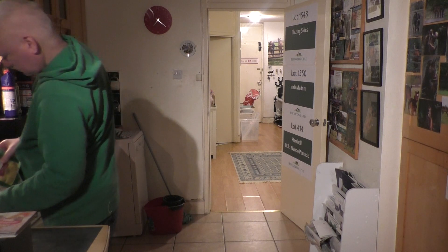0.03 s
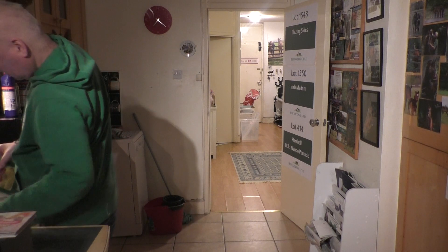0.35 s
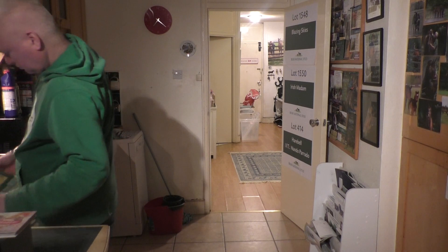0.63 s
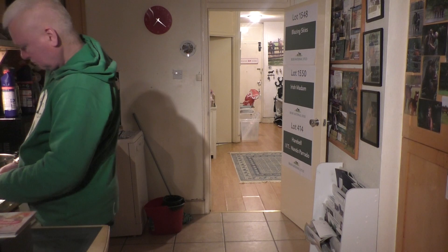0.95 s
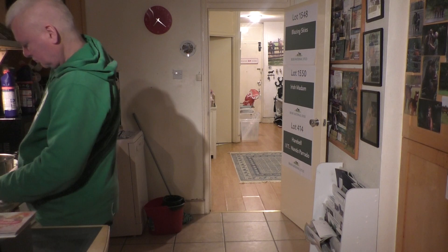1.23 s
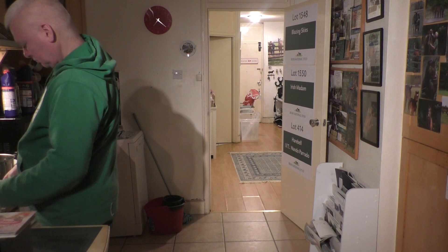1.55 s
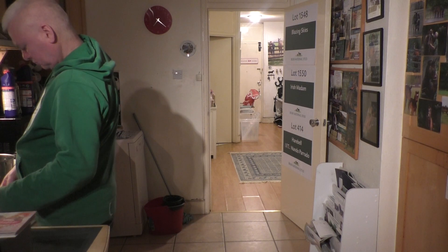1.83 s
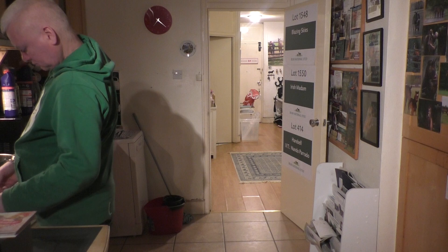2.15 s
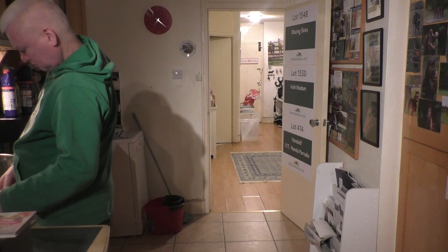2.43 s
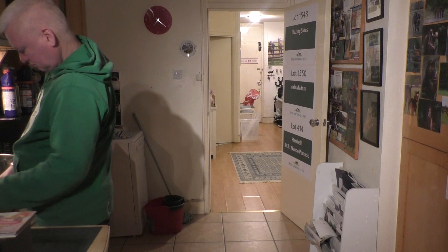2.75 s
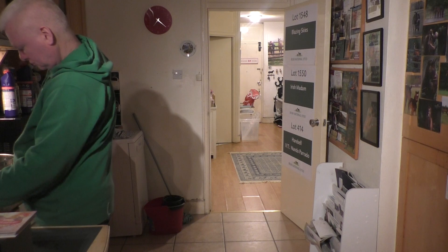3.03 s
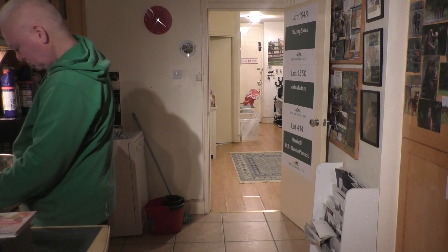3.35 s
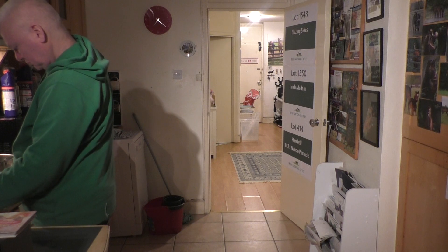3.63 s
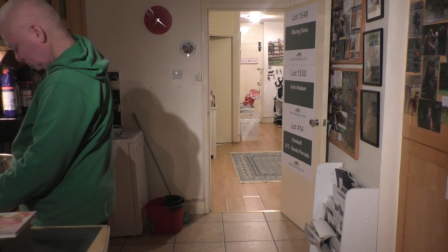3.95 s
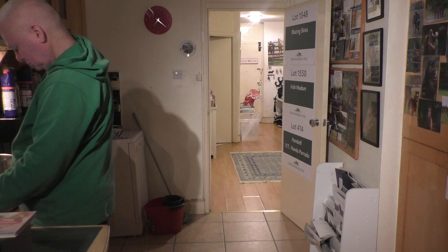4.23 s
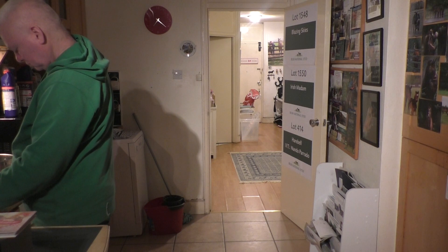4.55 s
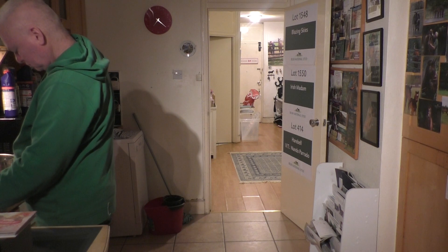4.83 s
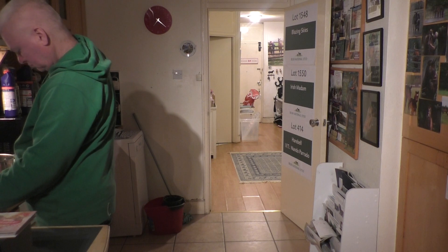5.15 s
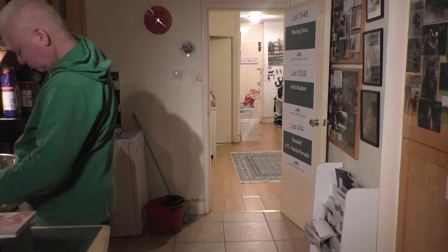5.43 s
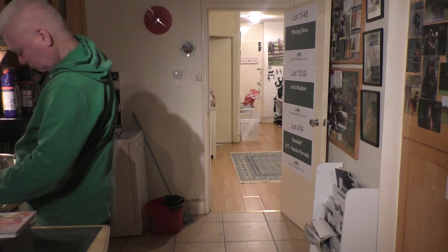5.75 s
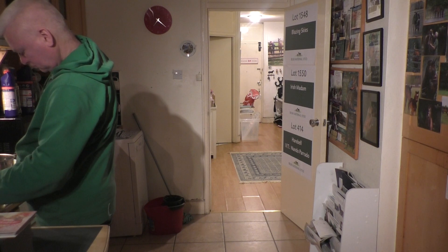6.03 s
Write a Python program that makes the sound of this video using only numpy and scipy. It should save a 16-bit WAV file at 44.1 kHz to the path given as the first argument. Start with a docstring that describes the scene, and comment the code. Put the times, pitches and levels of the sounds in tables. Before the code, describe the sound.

Over the steady low hum of an appliance, someone washes up in a slightly echoing kitchen. After a faint squeak of a sliding rim, pots, plates and cutlery knock against the steel basin and clink together, busiest and loudest in the first half. Later come scattered knocks, light scrapes and a couple of hollow thuds. The sink is a couple of metres from the microphone, slightly left.

```python
"""Washing up at a steel sink

Pots, plates and cutlery knock against the basin and clink on each other, a couple of metres away.
Between the blows they rub and slide; at the start, friction makes a rim sing and squeak.
The hard-walled kitchen answers every contact, and an appliance hums steadily."""
import sys
import numpy as np
from scipy import signal
from scipy.fft import rfft, irfft
from scipy.io import wavfile

SR = 44100
rng = np.random.default_rng(int(sys.argv[2]) if len(sys.argv) > 2 else 0)


def put_to_file(sound):
    """Save the sound as 16-bit audio at rate SR, in the file named by the first command-line argument."""
    columns = np.atleast_2d(sound).T  # one column per channel
    safe = np.clip(columns, -1, 1)
    whole_steps = np.round(safe * 32767)
    wavfile.write(sys.argv[1], SR, whole_steps.astype(np.int16))


N = 277830
TIME = np.arange(N) / SR

# stereo width: freq_hz, side_over_mid_db
WIDTH = [(30, -2), (125, -8), (300, -12), (1000, -9), (2200, -7.5), (4500, -9), (8000, -12), (13000, -19)]
# steady background, low room rush plus faint high microphone hiss: freq_hz, gain_db
BACKGROUND = [(25, -15), (70, -11), (95, -4.5), (135, 1.5), (170, -2), (200, 4), (320, -1), (420, -4),
              (520, -5), (650, -11), (850, -12), (1200, -11), (2200, -13), (4000, -32), (8000, -34),
              (13000, -24), (17000, -30.5)]
# friction envelopes of a sliding rim: start_s, end_s, fade_s, level_db
SINGING = (0, .42, .09, -51.5)
SQUEAK = (.09, .215, .015, -52)
# scuffs and slides: peak_s, fade_s, strength_db, hardness_db
STROKES = [(0.3, .36, -52.5, 4), (0.428, .022, -41.5, -2), (0.823, .009, -44, 13), (0.92, .15, -44.5, -6),
           (1.2, .11, -38, -17), (1.337, .018, -45, 10), (1.387, .026, -41.5, 8.5),
           (2.439, .016, -37, -4.5), (2.54, .08, -43.5, -8), (2.587, .018, -37.5, -4),
           (2.8, .15, -54.5, -3.5), (3.13, .036, -46, -7.5), (3.44, .09, -55, -7), (4.1, .03, -54, -4),
           (4.575, .085, -45.5, -10), (5.18, .028, -42.5, -8), (5.34, .2, -56, -4.5),
           (5.56, .017, -40.5, -7)]
# knocks in the sink: start_s, strength_db, hardness_db, kind
KNOCKS = [(0.0498, -55, 6, "rim"), (0.2905, -55, 11, "cutlery"), (0.698, -39, -16, "wall"),
          (0.8085, -24, -7, "wall"), (0.9607, -25.5, -17, "wall"), (0.9969, -25.5, -25, "wall"),
          (1.0624, -37, -4.5, "rim"), (1.1074, -25.5, -7.5, "wall"), (1.2104, -35.5, -2, "cutlery"),
          (1.2191, -18.5, -12.5, "rim"), (1.256, -19, -14, "rim"), (1.2832, -38, 9.5, "cutlery"),
          (1.3746, -31.5, -4.5, "wall"), (1.493, -26.5, -1.5, "rim"), (1.6937, -35.5, -22.5, "rim"),
          (1.9017, -28.5, -16, "rim"), (1.977, -26, -5, "rim"), (2.155, -34, -22, "wall"),
          (2.4335, -28, -8.5, "wall"), (2.5073, -24.5, -13.5, "wall"), (2.5925, -38, 1, "rim"),
          (2.699, -35, -19, "wall"), (3.1413, -28, -19.5, "wall"), (3.2774, -38, -23, "wall"),
          (4.0035, -49, -11, "cutlery"), (4.1265, -27.5, -9, "floor"), (4.4642, -50.5, 1, "cutlery"),
          (4.578, -29, -23, "wall"), (5.5917, -28, -15.5, "wall"), (5.7863, -41, -11, "rim"),
          (5.8374, -35, -10.5, "floor"), (6.0741, -40, -9.5, "rim")]
# per kind of knock: weight_db, fineness_db, bounce_s, chatter_ratio
BLOWS = {"rim": (-21, -6.5, .007, 1.3), "wall": (-15.5, -4, .008, 1.2), "floor": (-7.5, -8, .012, 1.4),
         "cutlery": (-1, -1.5, .005, 1.0)}
# spectra of a contact's body, hard edge and finest tick: freq_hz, gain_db
CLACK = [(40, -41), (200, -23), (400, -14.5), (650, -11), (900, -8), (1060, 1), (1600, 0.5), (2100, -2),
         (2700, -4), (3700, -9.5), (5000, -18.5), (8000, -23.5), (17000, -70)]
CRACK = [(40, -69), (700, -49), (2000, 5), (3600, 4.5), (5000, 2.5), (6500, -1), (8000, -7.5),
         (10000, -14.5), (17000, -34)]
TICK = [(40, -63), (3000, -20), (7500, -2.5), (9300, 0), (12000, -2.5), (14000, -6.5), (17000, -19)]
# modes of the rim, basin and dishes: pitch_hz, energy_db, t60_s
RIM = [(1330, -1, 0.023), (2200, 5, 0.01), (4250, -4, 0.012)]
BASIN_WALLS = [(997, 0.5, 0.23), (1119, 5.5, 0.054), (1323, 4.5, 0.18), (1430, 0, .12), (1550, -1, 0.098),
               (1793, -1.5, 0.071), (2110, -3, 0.16), (3520, -4.5, 0.013)]
BASIN_FLOOR = [(135, -12, .08), (285, -3.5, 0.037), (317.7, 0.5, 0.13), (384.6, 0, 0.056), (438, -4, 0.045),
               (526, -4.5, 0.1), (734, -4, 0.043), (894, -5, .04)]
BASIN_BOOM = [(285, -0.5, 0.061), (312, -2, 0.097), (1010, -11, .06), (1134, -3, .04), (2760, -8, .04),
              (3500, -16, .015)]
POT = [(1053, -11, 0.021), (1456, -7, 0.06), (1546, -3, .04), (1680, -1, 0.0099), (2290, -7.5, .015),
       (2690, -16, .04)]
PLATE = [(1015, -17.5, 0.092), (1914, -9, 0.016), (2000, -10, .06), (2470, -25, .04), (2960, -3.5, 0.017),
         (3150, -6, 0.027), (3280, -6.5, .045), (3360, -7.5, .045), (4380, -6, 0.0057),
         (5360, -11.5, 0.0023), (6080, -14, 0.0098)]
BOWL = [(1550, -2.5, 0.0099), (2220, -7, 0.044), (3122, -10, .04), (3320, -9, 0.05), (3600, -6, .02),
        (3865, -5.5, .05), (4150, -7, 0.013), (4600, -8.5, .012), (5800, -8.5, 0.0046)]
BODIES = {"pot": POT, "plate": PLATE, "bowl": BOWL, "basin": BASIN_BOOM}
# blows that ring a dish or boom the basin: start_s, strength_db, body
RINGS = [(0.8098, -24.5, "pot"), (1.28, -28, "pot"), (1.376, -38, "bowl"), (1.4925, -26.5, "plate"),
         (0.999, -46, "pot"), (1.692, -47, "pot"), (1.902, -38.5, "pot"), (1.976, -30, "bowl"),
         (2.592, -38.5, "bowl"), (3.594, -50, "pot"), (4.129, -42.5, "basin"), (4.579, -45, "plate"),
         (5.839, -45.5, "basin")]


def from_db(db):
    """Decibels to gain."""
    return 10 ** (np.asarray(db) / 20)


def unit_rms(x):
    """Scale to rms 1."""
    return x / np.sqrt(np.mean(x ** 2) + 1e-20)


def unit_energy(x):
    """Scale to energy 1."""
    return x / np.sqrt(np.sum(x ** 2) + 1e-20)


def bin_gains(spectrum, size=N):
    """Gain per FFT bin, interpolated in dB over log frequency."""
    freq_hz, gain_db = np.transpose(spectrum)
    bins_hz = np.maximum(np.fft.rfftfreq(size, 1 / SR), 1)
    return from_db(np.interp(np.log(bins_hz), np.log(freq_hz), gain_db))


def drift(rate_hz):
    """Straight lines between Gaussian random knots."""
    return np.interp(TIME * rate_hz, np.arange(N), rng.standard_normal(N))


def swell(start_s, end_s, fade_s, roundness=1.5):
    """Envelope: smooth rise, 1 from start to end, mirrored fall."""
    outside_s = np.abs(TIME - np.clip(TIME, start_s, end_s))
    return np.exp(-np.minimum((outside_s / fade_s) ** roundness, 40))


def add(track, start_s, sound):
    """Mix a sound into a track."""
    start = max(round(start_s * SR), 0)
    track[start:start + len(sound)] += sound[:N - start]


def through(stereo, response):
    """Convolve with an impulse response scaled to energy 1."""
    return np.array([signal.fftconvolve(channel, unit_energy(response))[:N] for channel in stereo])


def colour(spectrum, size=8192):
    """Minimum-phase impulse response of a spectrum."""
    cepstrum = irfft(np.log(bin_gains(spectrum, size)))
    cepstrum[1:size // 2] *= 2
    cepstrum[size // 2 + 1:] = 0
    return irfft(np.exp(rfft(cepstrum)))


def ringing(modes):
    """Impulse response of a struck body: damped modes of alternating sign."""
    t = TIME[:SR // 2]
    response = 0
    for k, (pitch_hz, energy_db, t60_s) in enumerate(modes):
        mode = np.cos(2 * np.pi * pitch_hz * t) * from_db(-60 * t / t60_s)
        response += (-1) ** k * from_db(energy_db) * unit_energy(mode)
    return response


def diffuse():
    """Stereo noise arriving from all around."""
    mid, side = rng.standard_normal((2, N))
    side = irfft(rfft(side) * bin_gains(WIDTH), N)
    return np.array([mid + side, mid - side])


def echo_envelope(force, t60_s):
    """Amplitude of the decaying energy a force leaves in the room."""
    retained = from_db(-60 / (t60_s * SR)) ** 2
    return np.sqrt(signal.lfilter([1 - retained], [1, -retained], force ** 2 + 1e-18))


def kitchen(force, t60_s, direct_db=-7, early_db=-6, early_t60_s=0.077, wall_hz=11000, lumpy_db=4.0):
    """Direct sound, lumpy early echoes and a duller tail off hard walls."""
    early = unit_rms(diffuse() * from_db(lumpy_db * drift(2500)))
    early *= echo_envelope(force, early_t60_s)
    pole = np.exp(-2 * np.pi * wall_hz / SR)
    tail = signal.lfilter([1 - pole], [1, -pole], unit_rms(diffuse()))
    tail *= echo_envelope(force, t60_s)
    return from_db(direct_db) * force + from_db(early_db) * early + tail


def appliance(pitch_hz=229.6, wander=0.0025, hum_db=-53, waver_db=1.4, background_db=-55):
    """A motor's steady tone over low room rush and faint high hiss."""
    background = unit_rms(irfft(rfft(diffuse()) * bin_gains(BACKGROUND), N))
    phase = 2 * np.pi * np.cumsum(pitch_hz * (1 + wander * drift(5.84))) / SR
    hum = unit_rms(np.sin(phase)) * from_db(hum_db + waver_db * drift(7.1))
    return from_db(background_db) * background + hum


def sliding_rim(squeak_hz=3080, waver=0.037):
    """Friction makes a rim sing; stick and slip briefly lock onto one wavering tone."""
    sing_gain, squeak_gain = [from_db(level_db) * swell(start_s, end_s, fade_s)
                              for start_s, end_s, fade_s, level_db in (SINGING, SQUEAK)]
    phase = 2 * np.pi * np.cumsum(squeak_hz * (1 + waver * drift(900))) / SR
    singing = through(unit_rms(diffuse()), ringing(RIM))
    return sing_gain * singing + squeak_gain * unit_rms(np.sin(phase))


def rubbing(slips_per_s=3000, uneven_db=3.2, rest_rub_db=-58.3, rest_hiss_db=-72.5, jolt_s=0.001):
    """Rub, bump and hiss forces: constant tiny slips under an uneven hand, pressed harder in strokes."""
    rub, bump, hiss = from_db(rest_rub_db), 0, from_db(rest_hiss_db)
    for peak_s, fade_s, strength_db, hardness_db in STROKES:
        pressure = from_db(strength_db) * swell(peak_s, peak_s, fade_s)
        rub = np.hypot(rub, pressure)
        bump = np.hypot(bump, pressure * (jolt_s / fade_s) ** 0.3)  # slower strokes thud less
        hiss = np.hypot(hiss, pressure * from_db(hardness_db))
    slips = rng.standard_normal(N) * (rng.random(N) < slips_per_s / SR)
    return np.array([rub, bump, hiss]) * unit_rms(slips * from_db(uneven_db * drift(35)))


def contact(bounce_s, chatter_ratio, bounces_per_s=1500):
    """Force of one blow: a sharp touch, then tiny bounces dying as the object seats."""
    t = TIME[:SR // 8]
    bounces = rng.standard_normal(len(t)) * (rng.random(len(t)) < bounces_per_s / SR)
    force = chatter_ratio * unit_energy(bounces * np.exp(-t / bounce_s))
    force[0] = 1
    return unit_energy(force)


def knocks(clack_db=20, thud_db=27, crack_db=29, tick_db=29):
    """Clack, thud, crack and tick forces: hardness lifts the edge, kind sets weight and rattle."""
    forces = np.zeros((4, N))
    for start_s, strength_db, hardness_db, kind in KNOCKS:
        weight_db, fineness_db, bounce_s, chatter_ratio = BLOWS[kind]
        blow = contact(bounce_s, chatter_ratio)
        gains_db = [clack_db, thud_db + weight_db,
                    crack_db + hardness_db, tick_db + hardness_db + fineness_db]
        for force, gain_db in zip(forces, gains_db):
            add(force, start_s, from_db(strength_db + gain_db) * blow)
    return forces


def sink(clack_db=-1, walls_db=-8, hiss_tick_db=-3):
    """Rubs and knocks drive the basin: a clack that rings its walls, a floor thud, a crack, a tick."""
    rub, bump, hiss = rubbing()
    clack, thud, crack, tick = knocks() + [rub, bump, hiss, from_db(hiss_tick_db) * hiss]
    body = through(kitchen(clack, t60_s=0.48), colour(CLACK))
    walls = through(kitchen(clack, t60_s=0.48), ringing(BASIN_WALLS))
    floor = through(kitchen(thud, t60_s=0.44), ringing(BASIN_FLOOR))
    edge = through(kitchen(crack, t60_s=0.48, direct_db=-10, early_db=-5), colour(CRACK))
    top = through(kitchen(tick, t60_s=0.37, direct_db=-13, early_db=-7, wall_hz=5930), colour(TICK))
    return from_db(clack_db) * body + from_db(walls_db) * walls + floor + edge + top


def clinks_and_booms(ring_db=28):
    """Struck dishes ring in their own modes; the basin booms low under a heavy blow."""
    rings = 0
    for name, modes in BODIES.items():
        force = np.zeros(N)
        for start_s, strength_db, body in RINGS:
            if body == name:
                force[round(start_s * SR)] += from_db(strength_db + ring_db)
        rings += through(kitchen(force, t60_s=0.52, direct_db=-5), ringing(modes))
    return rings


def pan_left(stereo, db):
    """Raise the left channel and lower the right, each by db."""
    return stereo * from_db([[db], [-db]])


def scene():
    """Washing up over the hum, both slightly left."""
    washing = sink() + clinks_and_booms() + sliding_rim()
    return pan_left(washing, db=0.45) + pan_left(appliance(), db=0.8)


def record(dry, cutoff_hz=17300):
    """Steep elliptic low-pass."""
    return signal.sosfilt(signal.ellip(10, 0.2, 70, cutoff_hz, fs=SR, output="sos"), dry)


dry = scene()
out = record(dry)
put_to_file(out)
```